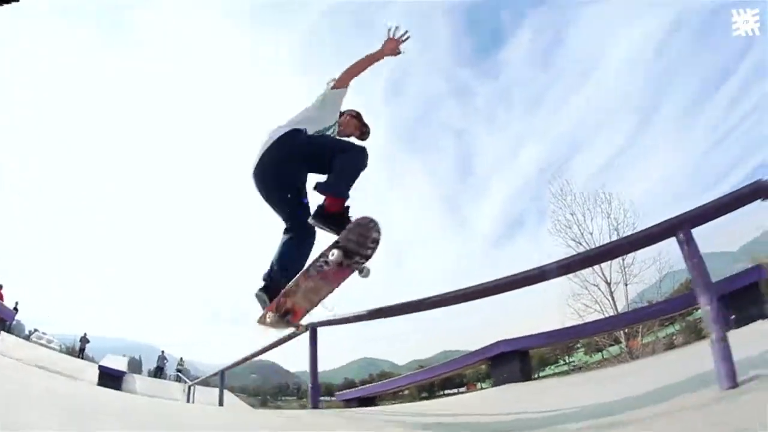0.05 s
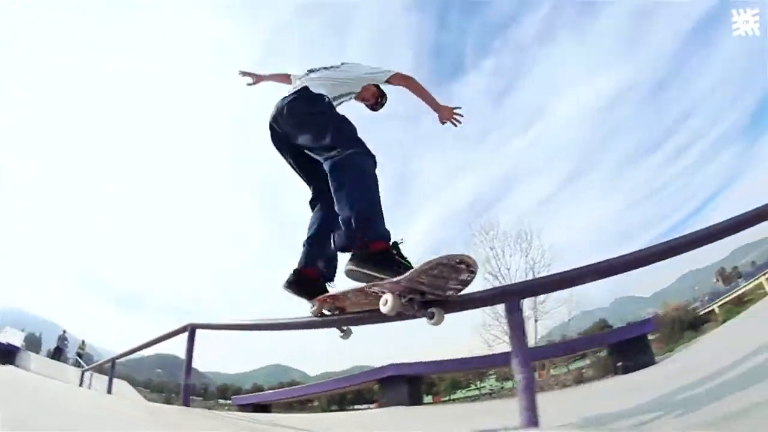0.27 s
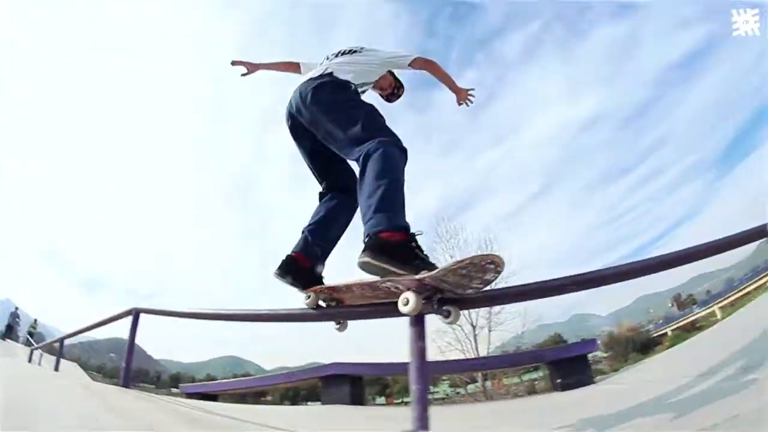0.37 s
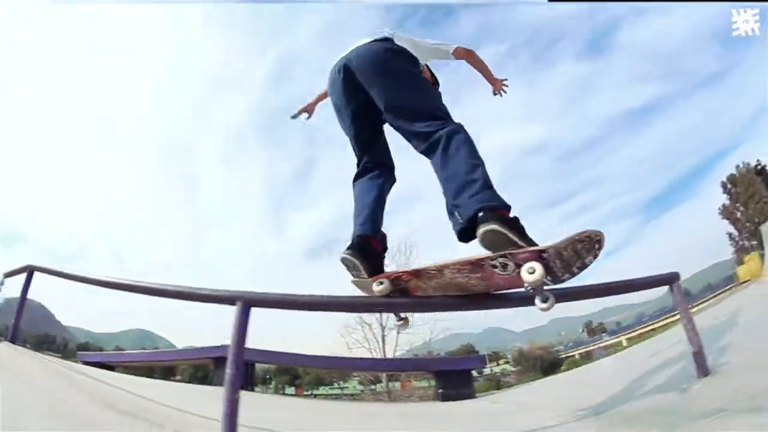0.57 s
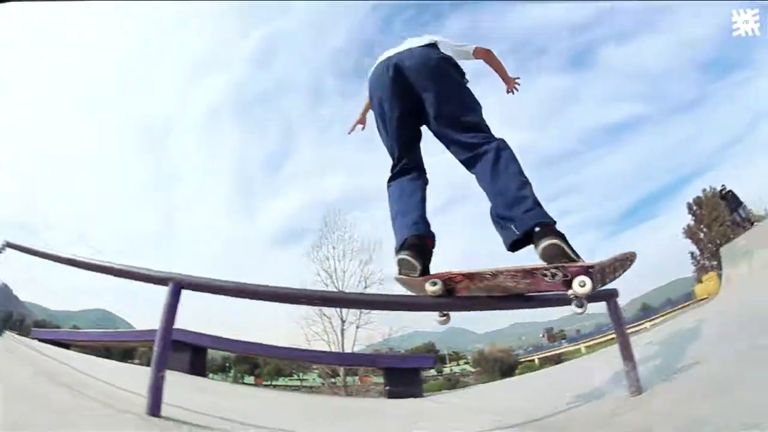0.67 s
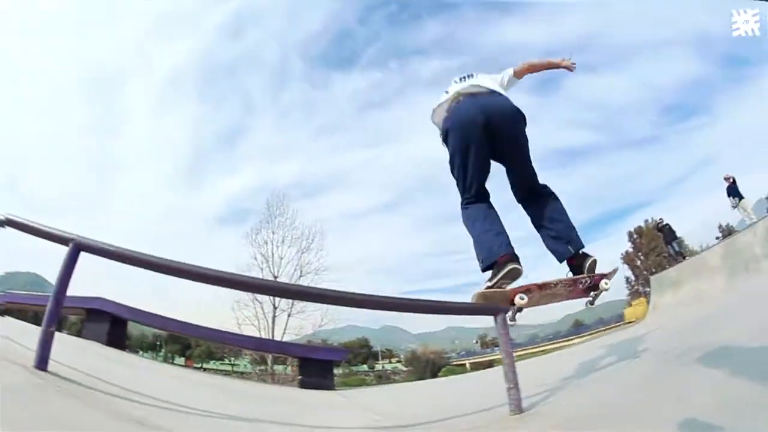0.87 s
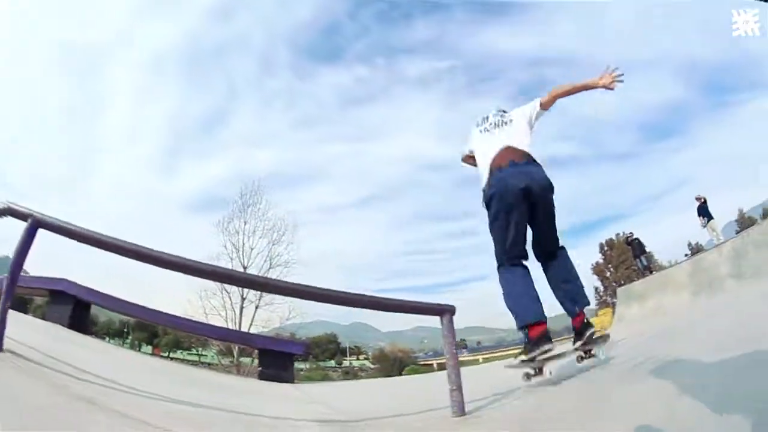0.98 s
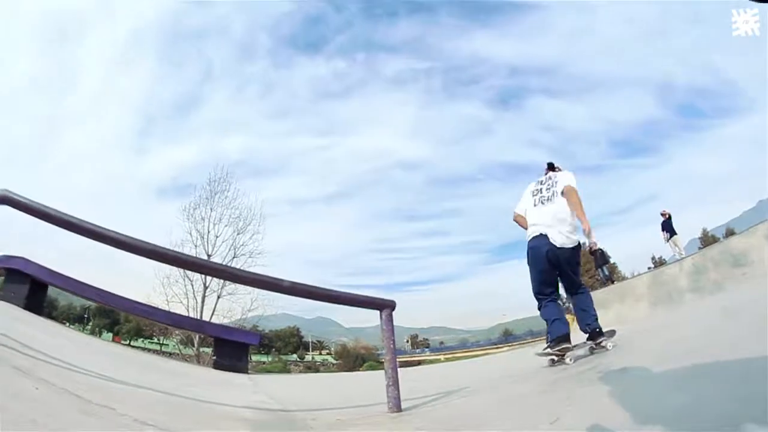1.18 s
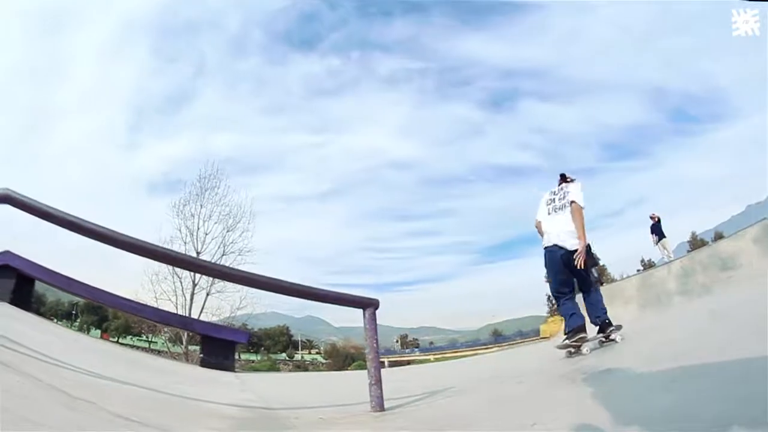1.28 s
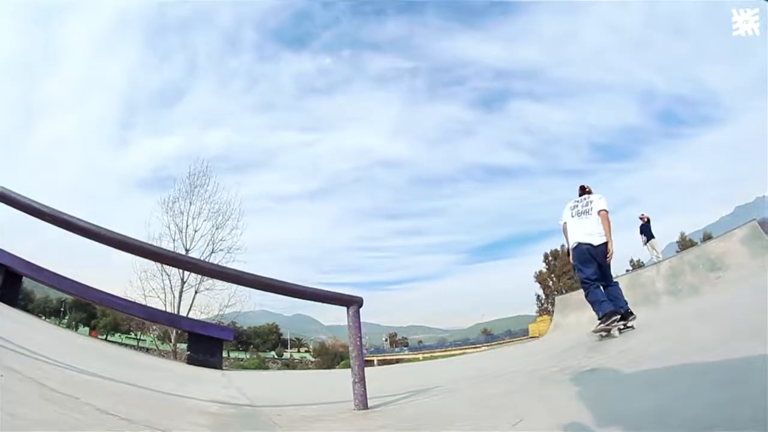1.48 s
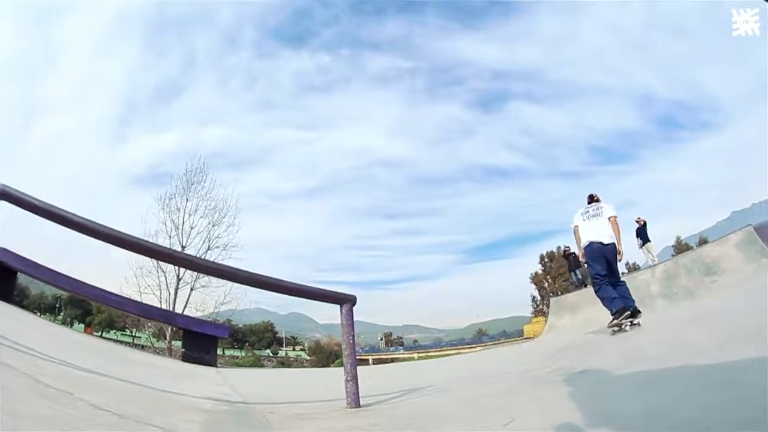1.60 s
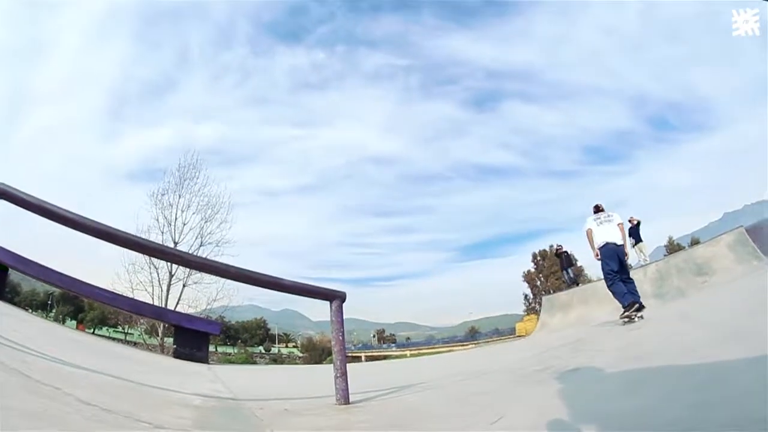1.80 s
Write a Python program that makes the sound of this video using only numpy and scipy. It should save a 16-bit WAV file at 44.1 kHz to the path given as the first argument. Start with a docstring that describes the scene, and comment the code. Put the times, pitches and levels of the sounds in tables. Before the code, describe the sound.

Skateboard clacking onto a ringing steel rail, sliding, then smacking down and rolling off.

```python
"""A skateboard is in the air, wheels spinning freely. At 0.25 s it slams onto a steel rail, which rings.
The deck slides along it, squeals once and scrapes off the far end near 0.86 s; the rail rings again.
At 1.07 s wheels and deck smack down on concrete, then the board rolls away, growing duller.
The microphone is close and overloads on the hardest blows."""
import sys
import numpy as np
from scipy import signal
from scipy.fft import rfft, irfft
from scipy.io import wavfile
from scipy.ndimage import uniform_filter1d

SR = 44100
rng = np.random.default_rng(int(sys.argv[2]) if len(sys.argv) > 2 else 0)


def dump_mix(stems):
    """Bounce the given channels to the path in sys.argv[1] as a 16-bit WAV at rate SR."""
    frames = np.atleast_2d(stems).T  # one column per channel
    limited = np.clip(frames, -1, 1)  # hard clip at full scale
    pcm = np.round(limited * 32767).astype(np.int16)
    wavfile.write(sys.argv[1], SR, pcm)


N = 81585
T = np.arange(N) / SR

# board on rail: t/s, level/dB, clack t60/s, deck knock/dB
RAIL_BLOWS = [(0.2441, -10, 0.063, -23), (.248, 8.5, 0.024, -10.5), (0.2573, 2.5, 0.028, -7.5),
              (0.263, -7.5, 0.21, -21), (0.2875, -3, 0.028, -9), (0.301, 6.5, 0.021, -13),
              (0.306, -12.5, 0.1, -13)]
# wheels and deck on concrete: t/s, level/dB, crack offset/dB
LANDING_BLOWS = [(1.0695, -3.5, 7.5), (1.07, -5.5, 9.5), (1.0759, 6, -2.5), (1.085, -5, -4),
                 (1.0882, -12.5, 0), (1.0961, -11.5, 3)]
# shoes, trucks and wheels: t/s, level/dB, treble offset/dB, t60/s
LIGHT_KNOCKS = [(.001, -26, 2, 0.15), (0.1046, -28, 3, 0.052), (0.743, -32.5, 4.5, 0.14),
                (0.7902, -20.5, -5, 0.06), (0.852, -20.5, -0.5, 0.13), (0.863, -24.5, 6.5, 0.1),
                (0.872, -27, 7, 0.13), (0.915, -25, -1.5, 0.05), (1.157, -37, -7, 0.089),
                (1.41, -35, -7, 0.031)]
# truck catching on steel: t/s, level/dB
TRUCK_TICKS = [(0.8627, -28), (.8915, -26), (.9175, -29)]
# ring of trucks and deck: f/Hz, relative level/dB
BOARD_MODES = [(897, -9), (1180, -15.5), (2126, -14.5), (3473, -8.5), (3606, -8), (3800, -11.5),
               (4517, -13)]
# ring of the steel tube: f/Hz, t60/s, near-end strike/dB, far-end strike/dB
RAIL_MODES = [(92.5, 0.65, -32, -48), (295.8, 0.41, -27, -37), (405.5, 0.6, -26.5, -38.5),
              (506, 0.85, -28, -49), (644, 0.6, -34, -39), (728, 1.4, -38.5, -35), (1172, 0.28, -16, -57),
              (1324, 0.33, -23.5, -28.5), (1417, 0.62, -69, -28), (1537, 0.54, -47, -37),
              (2020, 0.99, -30.5, -34.5), (2093, 0.93, -41, -33.5), (2975, 0.1, -35, -20.5),
              (5920, 0.28, -25.5, -34.5)]

# spectra: f/Hz, relative level/dB
WIND_SPECTRUM = [(60, -4), (8000, -51)]
SPIN_SPECTRUM = [(200, -10), (700, 0.5), (2500, -4), (3700, -2.5), (5200, -13), (16000, -30.5)]
ROLL_SPECTRUM = [(50, -16.5), (160, 0.5), (550, 0), (900, -7), (1250, -4), (1950, -9), (2600, -20.5),
                 (3800, -9.5), (5300, -20), (6500, -16.5), (11500, -35.5)]
BODY_SPECTRUM = [(50, -22.5), (280, 7.5), (450, -9), (1050, 5), (1800, -17), (16000, -69)]
HARDWARE_SPECTRUM = [(500, -19), (1800, -9), (2500, -9), (3150, -0.5), (4300, -3.5), (5200, -12),
                     (9000, -17.5), (16000, -34)]
TICK_SPECTRUM = [(3000, -14), (7500, 0), (16000, -16)]
SCRAPE_SPECTRUM = [(60, -6), (600, 2.5), (950, 6), (1700, -5), (2070, 8.5), (2450, -4), (3700, 3),
                   (5200, -14.5), (6200, -7.5), (11000, -15.5), (16000, -23)]
THUD_SPECTRUM = [(60, -11.5), (250, -6), (580, 3), (880, -15.5), (1150, -0.5), (1800, -20), (8000, -46)]
CRACK_SPECTRUM = [(300, -17), (1300, 1.5), (2650, -2.5), (3450, 6), (4300, -5), (7000, -7.5), (10000, -21),
                  (16000, -49)]
CLACK_SPECTRUM = [(40, -13), (500, -10.5), (900, -1), (1600, -6.5), (2400, -4), (3600, -0.5), (5100, -15),
                  (6000, -7), (7500, -20), (11000, -23), (16000, -55)]

# envelopes of free spin, deck pressure on the rail, roll-away: t/s, level/dB
SPIN_ENVELOPE = [(0, -24.5), (.08, -32), (.2, -36.5), (.97, -36.5), (1.13, -34.5), (1.25, -67)]
SLIDE_ENVELOPE = [(.25, -15), (.325, -23), (.36, -26), (.495, -33), (.52, -29), (.6, -37), (.7, -41.5),
                  (.76, -33.5), (.85, -32), (.868, -25.5), (.92, -29.5), (.97, -57)]
ROLL_ENVELOPE = [(1.07, -34), (1.2, -35.5), (1.37, -39), (1.55, -35.5), (1.85, -40.5)]


def amp(db):
    """Decibels to gain."""
    return 10 ** (np.asarray(db) / 20)


def unit_rms(x):
    """Scales to rms 1."""
    return x / np.sqrt(np.mean(x ** 2) + 1e-20)


def envelope(points):
    """Gain along (t/s, level/dB); a curve starting at 0.1 s or later is silent until then."""
    t_s, db = np.transpose(points)
    return amp(np.interp(T, t_s, db)) * ((T >= t_s[0]) | (t_s[0] < .1))


def decay(start_s, t60_s):
    """Instant attack, exponential decay."""
    return (T >= start_s) * amp(-60 * np.maximum(T - start_s, 0) / t60_s)


def swell(centre_s, half_width_s):
    """Gaussian bump of height 1."""
    return np.exp(-((T - centre_s) / half_width_s) ** 2)


def colour(x, spectrum):
    """Minimum-phase filter of unit energy along (f/Hz, level/dB)."""
    points_hz, db = np.transpose(spectrum)
    bins_hz = abs(np.fft.fftfreq(4096, 1 / SR))
    log_gain = np.log(amp(np.interp(np.log(bins_hz + 1), np.log(points_hz), db)))
    taps = np.fft.ifft(np.exp(np.conj(signal.hilbert(log_gain)))).real
    return signal.fftconvolve(x, taps / np.linalg.norm(taps))[:N]


def lowpass(x, hz):
    """Zero-phase treble cut: second order, forward and back."""
    sos = signal.butter(2, hz, fs=SR, output="sos")
    return signal.sosfilt(sos, signal.sosfilt(sos, x)[::-1])[::-1]


def drift(hz):
    """Random wander of rms 1, up to about hz."""
    rolloff = np.exp(-(np.fft.rfftfreq(N, 1 / SR) / hz) ** 2)
    return unit_rms(irfft(rfft(rng.standard_normal(N)) * rolloff, N))


def grains(per_s, spread_db):
    """Random clicks of uneven size, rms 1."""
    size = amp(spread_db * np.minimum(rng.exponential(1, N), 4))
    return unit_rms(size * rng.choice([-1., 1.], N) * (rng.random(N) < per_s / SR))


def blows(rows):
    """Energy sum of decays (t/s, level/dB, t60/s)."""
    return np.sqrt(sum((amp(db) * decay(t_s, t60_s)) ** 2 for t_s, db, t60_s in rows))


def rattle(rows, spectrum):
    """Dense short resonances: coloured noise under blows (t/s, level/dB, t60/s)."""
    return colour(blows(rows) * rng.standard_normal(N), spectrum)


def tone(hz, smear_rad=0):
    """One mode of rms 1 with wandering phase."""
    return np.sqrt(2) * np.sin(2 * np.pi * (hz * T + rng.random()) + smear_rad * drift(27))


def wind():
    """Faint, lumpy air rumble; swells as the rider passes."""
    level_db = -55 - 1.5 * drift(1.9) + 8 * swell(centre_s=0.65, half_width_s=0.13)
    return amp(level_db) * colour(rng.standard_normal(N), WIND_SPECTRUM)


def wheels(dull_from_s=1.29, dull_db_per_s=18.5):
    """Bearings whirr in the air; on the ground the wheels drum over grit, duller with distance."""
    spin = colour(grains(per_s=7100, spread_db=2.5) * envelope(SPIN_ENVELOPE), SPIN_SPECTRUM)
    grit = grains(per_s=3300, spread_db=2.5) * amp(1.3 * drift(45))
    roll = colour(grit * envelope(ROLL_ENVELOPE), ROLL_SPECTRUM)
    low = lowpass(roll, hz=4680)
    treble_gain = amp(-dull_db_per_s * np.maximum(T - dull_from_s, 0))
    return spin + low + treble_gain * (roll - low)


def tap(hz=1750):
    """One light, pitched click from the board in mid-air."""
    return amp(-22) * decay(start_s=.1064, t60_s=0.033) * (tone(hz) + .5 * tone(2 * hz))


def knocks():
    """Light knocks: wooden body plus a brighter, gritty rattle of hardware."""
    body = rattle([(t_s, db, t60_s) for t_s, db, _, t60_s in LIGHT_KNOCKS], BODY_SPECTRUM)
    hardware = blows([(t_s, db + treble_db, t60_s) for t_s, db, treble_db, t60_s in LIGHT_KNOCKS])
    return body + colour(hardware * grains(per_s=3400, spread_db=2), HARDWARE_SPECTRUM)


def ticks(t60_s=.012):
    """The truck catches on the steel: sharp, bright ticks."""
    return rattle([(t_s, db, t60_s) for t_s, db in TRUCK_TICKS], TICK_SPECTRUM)


def slide():
    """Wood sticks and slips on worn paint: chattering scrape, one thin squeal."""
    chatter = grains(per_s=3500, spread_db=1.5) * amp(drift(160))
    scrape = colour(chatter * envelope(SLIDE_ENVELOPE), SCRAPE_SPECTRUM)
    squeal = amp(-46) * swell(centre_s=0.668, half_width_s=0.036) * tone(11000) * drift(300)
    return scrape + squeal


def rail(near_s=0.282, far_s=0.86, rise_s=0.039, waver_db=1.5):
    """The tube rings with one mode mix where the board lands, another where it leaves."""
    ring = np.zeros(N)
    for hz, t60_s, near_db, far_db in RAIL_MODES:
        strikes = blows([(near_s, near_db, t60_s), (far_s, far_db, t60_s)])
        gain = uniform_filter1d(strikes, int(rise_s * SR))
        mode = tone(hz, smear_rad=(hz / 2720) ** 2)  # high modes blur into clusters
        ring += gain * mode * amp(waver_db * drift(42))
    return ring


def landing(deck_t60_s=0.015, thud_t60_s=0.038, crack_t60_s=0.029):
    """Wheels and deck hit concrete in quick succession; the rider's weight damps the deck."""
    deck_gain = blows([(t_s, db, deck_t60_s) for t_s, db, _ in LANDING_BLOWS])
    deck = amp(-3) * tone(572, smear_rad=2.06) * deck_gain
    thuds = [(t_s, db, thud_t60_s) for t_s, db, _ in LANDING_BLOWS]
    cracks = [(t_s, db + crack_db, crack_t60_s) for t_s, db, crack_db in LANDING_BLOWS]
    return deck + rattle(thuds, THUD_SPECTRUM) + rattle(cracks, CRACK_SPECTRUM)


def board_on_rail(knock_t60_s=0.049, ring_t60_s=0.069, clang_t60_s=0.023):
    """The board slams and bounces: clack, hollow deck knock, ring of trucks and deck, steel clang."""
    clack = rattle([(t_s, db, t60_s) for t_s, db, t60_s, _ in RAIL_BLOWS], CLACK_SPECTRUM)
    knock = tone(975, smear_rad=1.7)
    knock *= blows([(t_s, knock_db, knock_t60_s) for t_s, _, _, knock_db in RAIL_BLOWS])
    ring = sum(amp(db) * tone(hz) * amp(4.1 * drift(42)) for hz, db in BOARD_MODES)
    ring *= blows([(t_s, db, ring_t60_s) for t_s, db, _, _ in RAIL_BLOWS])
    clang = tone(3527) * drift(330)
    # square law: only hard blows bring out the clang
    clang *= blows([(t_s, 2 * db, clang_t60_s) for t_s, db, _, _ in RAIL_BLOWS])
    return clack + knock + amp(-11) * ring + amp(-6) * clang


def scene():
    """The whole trick in open air, mono."""
    mix = tap() + board_on_rail() + rail() + slide() + knocks() + ticks() + landing() + wheels() + wind()
    return mix[None]


def record(dry):
    """Microphone clipping on hard blows, then a band limit."""
    clip_level, edge_hz = 0.99, 15850
    clipped = np.clip(dry, -clip_level, clip_level)
    taps = signal.firwin(511, edge_hz, window=("kaiser", 8), fs=SR)
    return signal.oaconvolve(clipped, taps[None], "same")


dry = scene()
out = record(dry)
dump_mix(out)
```